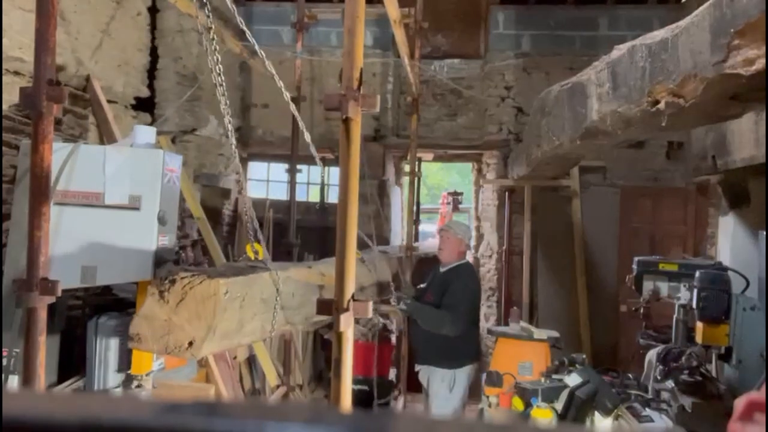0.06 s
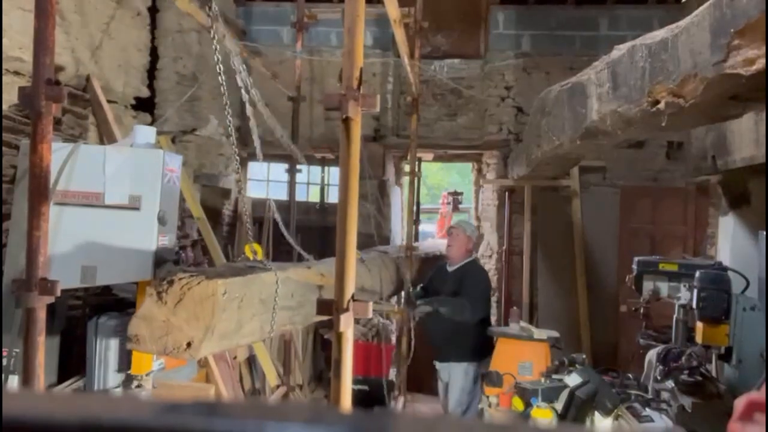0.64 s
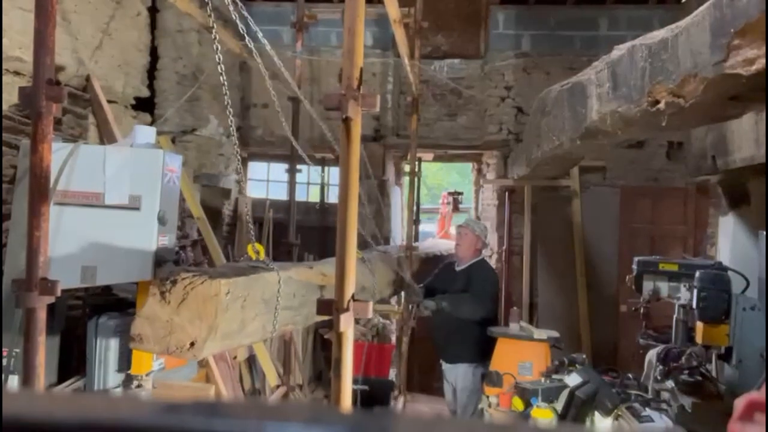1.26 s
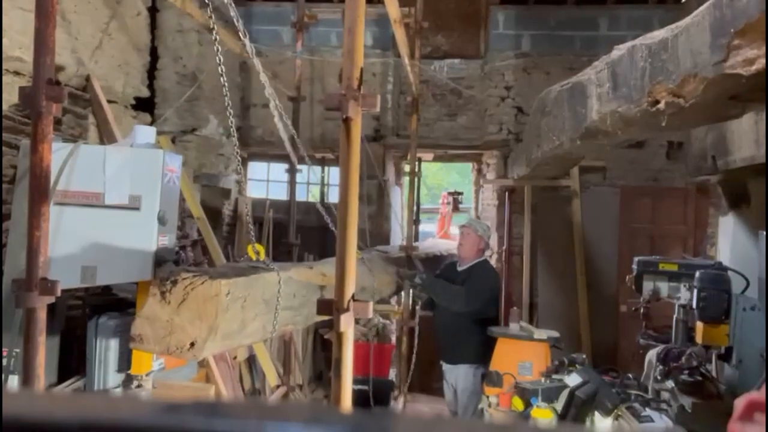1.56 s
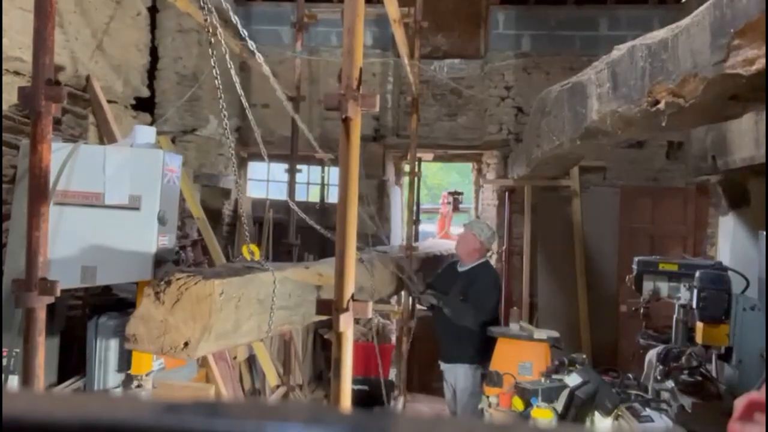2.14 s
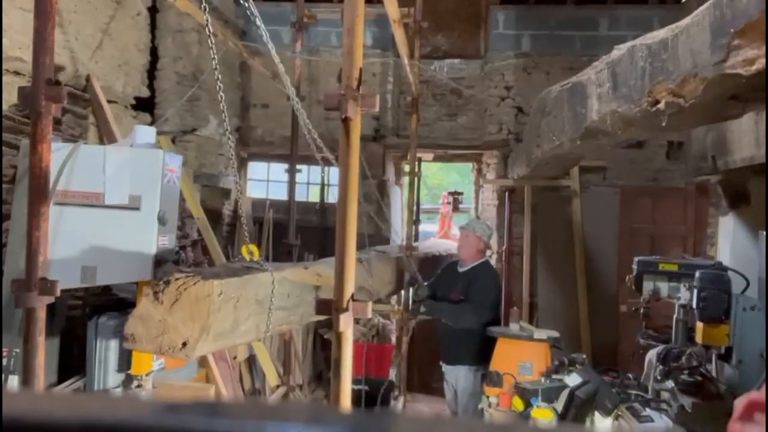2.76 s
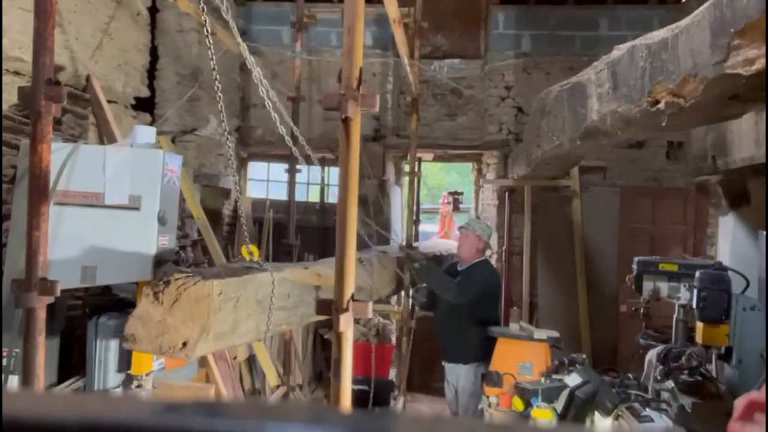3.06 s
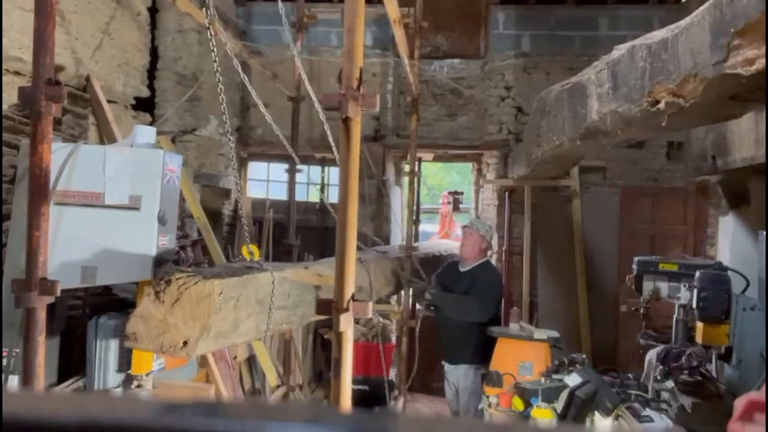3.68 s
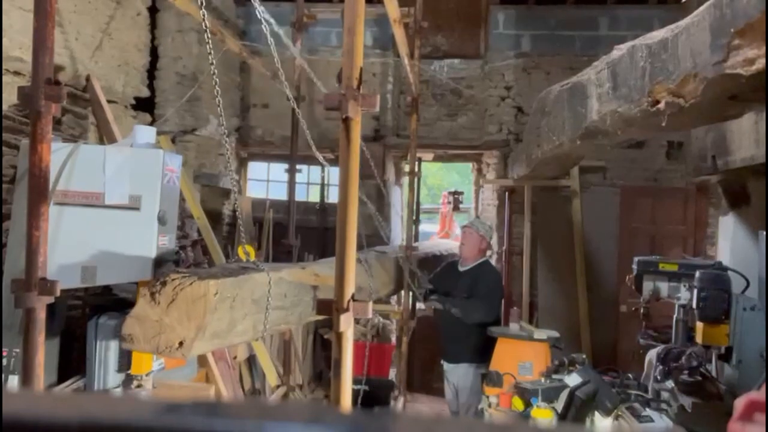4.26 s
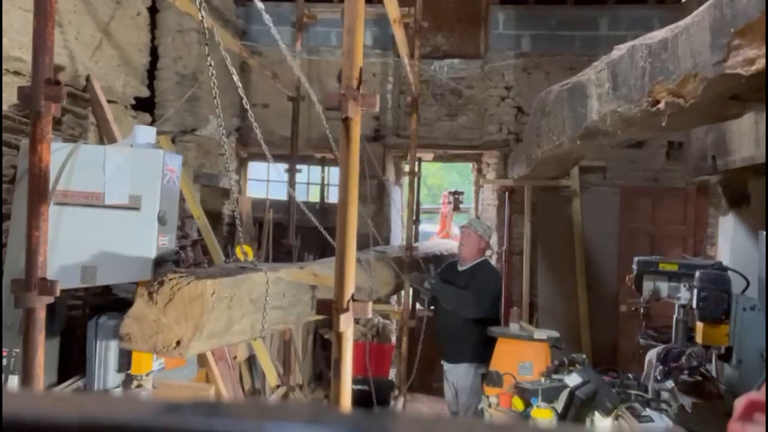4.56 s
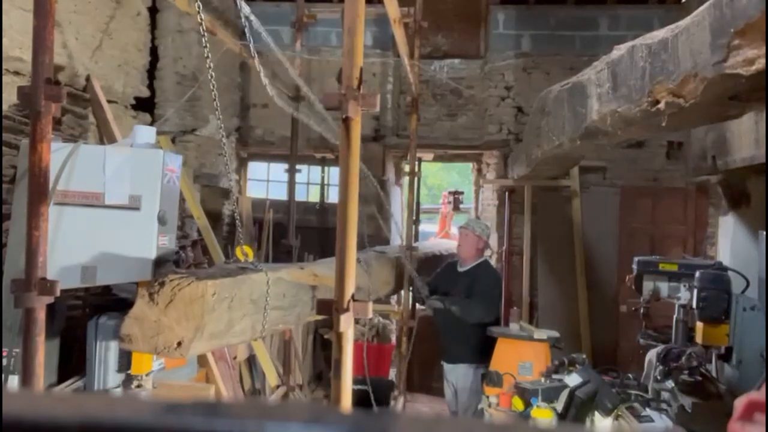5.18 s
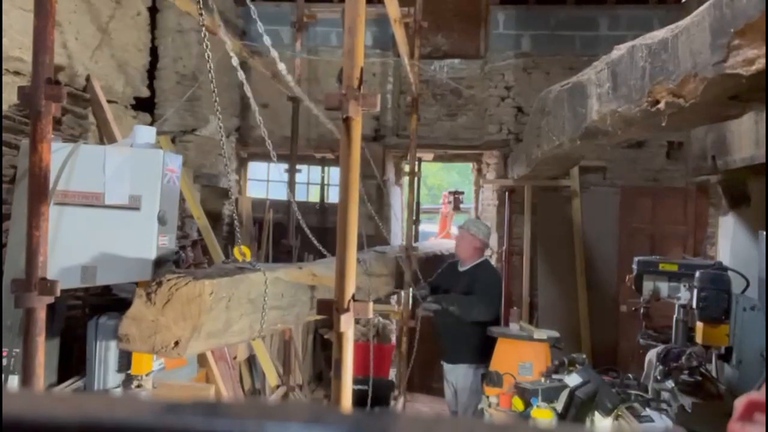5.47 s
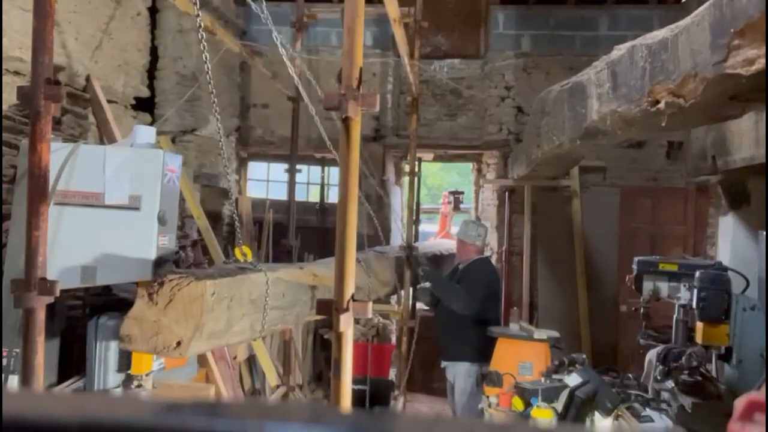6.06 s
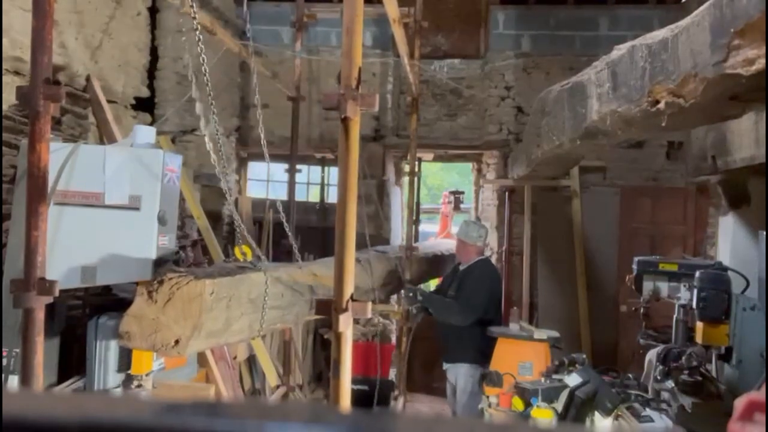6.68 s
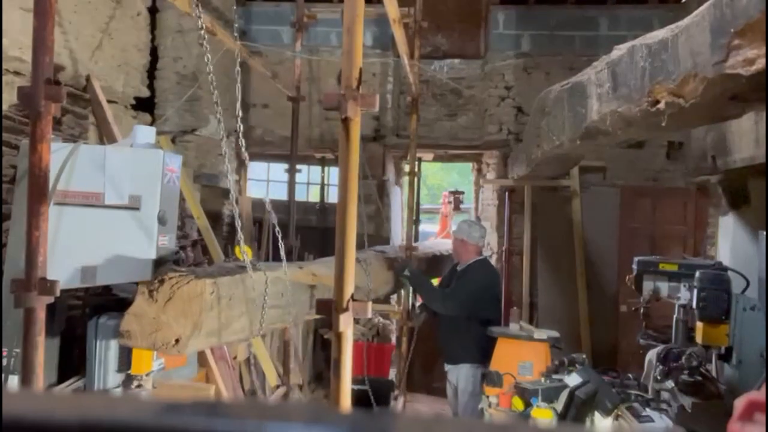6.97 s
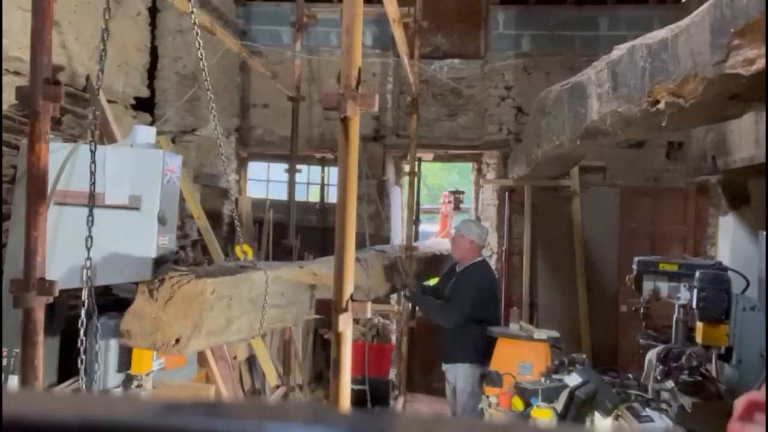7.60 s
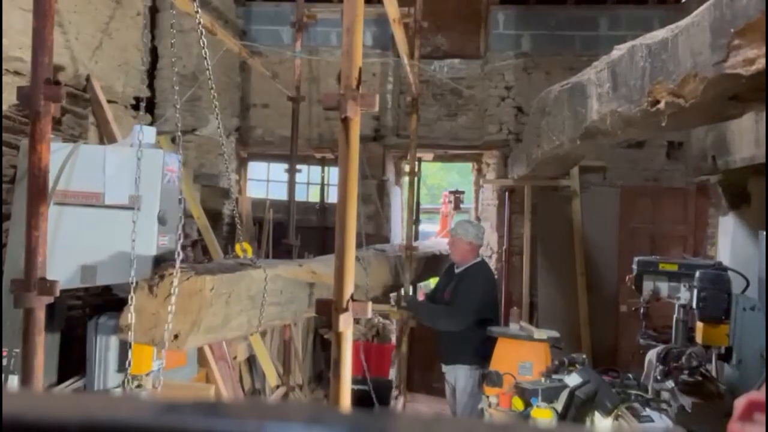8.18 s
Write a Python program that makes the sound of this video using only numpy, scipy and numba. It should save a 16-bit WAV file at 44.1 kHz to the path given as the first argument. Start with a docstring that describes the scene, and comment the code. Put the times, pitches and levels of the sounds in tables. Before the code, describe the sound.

The hand chain of a hoist rattles and clinks in uneven pulls inside a barn, over a low steady engine hum.

```python
"""Chain hoist in a stone barn

A stereo pair stands in the barn, the block hanging to its left, as a man shifts a heavy beam pull by pull.
The hand chain clatters over the wheel and knocks on the steel housing; a thin whine comes in brief bursts.
At the end the slack loop swings and jingles straight ahead. Close timber and stone walls reflect it all.
Farther off, an engine hums steadily through the walls."""
import sys
import numpy as np
from scipy import signal
from scipy.fft import rfft, irfft, next_fast_len
from scipy.io import wavfile
from scipy.ndimage import uniform_filter1d, map_coordinates
from numba import njit

SR = 44100
rng = np.random.default_rng(int(sys.argv[2]) if len(sys.argv) > 2 else 0)


def output_pcm(signal):
    """Save a mono or channel-first signal as 16-bit PCM at the path in sys.argv[1].

    Samples are clipped to [-1, 1] before scaling.
    """
    pcm = np.clip(np.atleast_2d(signal).T, -1, 1) * 32767
    wavfile.write(sys.argv[1], SR, np.round(pcm).astype(np.int16))


N = 367331

# Table levels are relative: each source is given its own gain further down.
# room tone of the barn: (frequency [Hz], level [dB])
ROOM_TONE = [(20, -17), (40, -15), (65, 3), (110, -0.5), (190, -11.5), (310, 0), (450, -4.5), (800, -15.5),
             (1500, -19.5), (4000, -34), (11000, -53)]
# the engine outside, slowing a little: (time [s], firing rate [Hz])
FIRING_RATE = [(0, 87.9), (1.6, 87.7), (3.1, 86.7), (5.7, 85.7), (8.33, 84.3)]
# its tones through the wall: (multiple of the firing rate, level [dB])
HUM_ORDERS = [(.5, -42.5), (1, -31), (1.5, -40.5), (4.5, -52.5)]
# reverberation off the stone walls: (frequency [Hz], t60 [s])
WALL_DECAY = [(200, 0.93), (1000, 0.26), (4000, 0.37), (11000, 0.21)]
# side against mid in reflections and room tone: (frequency [Hz], gain [dB])
SIDE_GAIN = [(30, -20), (80, -11), (330, -12.5), (600, 0), (2300, -2), (6800, 0), (8000, -5), (8800, -53),
             (12000, -53)]
# left microphone over right: (frequency [Hz], gain [dB])
MIC_BALANCE = [(43, 1), (86, 4), (130, 5), (250, 0.7), (550, 0.5), (1000, 2.5), (2200, -0.6), (4200, -1),
               (8000, -1)]

# groans under the shifting load: (start [s], length [s], pitch [Hz], level [dB])
LOAD_GROANS = [(0.579, 0.088, 260.7, -37), (0.988, 0.12, 252.6, -42), (7.507, 0.27, 222.6, -43.5)]
# swings of the slack loop: (start [s], rise [s], hold [s], level [dB])
LOOP_SWINGS = [(0, 0.00078, 0.13, -33), (.13, 0.012, 0.089, -37), (6.483, 0.035, 0.13, -33.5),
               (6.68, 0.03, 0.12, -48.5), (7.179, 0.096, 0.079, -35.5), (7.415, 0.011, 0.052, -31),
               (7.51, 0.015, 0.084, -34), (7.6, 0.017, 0.29, -36.5), (7.899, 0.093, 0.25, -31),
               (8.22, 0.013, 0.087, -41.5)]
# the loop's jingle: (frequency [Hz], level [dB])
LOOP_SPECTRUM = [(260, -49), (450, -4), (584, 5.5), (689, -12), (780, -4.5), (1240, -1.5), (1470, -3.5),
                 (1640, 0), (3630, -6), (4280, -2), (4850, -6.5), (7950, -4), (8990, -2.5), (11100, -5),
                 (12000, -19), (15600, -44), (22000, -120)]
# links sliding through the guide: (start [s], length [s], level [dB])
GUIDE_SLIDES = [(.385, 0.045, -38.5), (0.814, .1, -38.5), (1.235, 0.097, -37)]
# their hiss: (frequency [Hz], level [dB])
SLIDE_SPECTRUM = [(3000, -12), (5400, 2), (7500, -4), (11000, -18)]
# brief bursts of a thin, high whine: (start [s], length [s], level [dB])
WHINE_BURSTS = [(1.216, 0.31, -42.5), (2.551, 0.1, -35), (3.094, 0.12, -28), (3.986, 0.086, -30.5),
                (5.875, 0.086, -37.5)]
# partials of the whine: (frequency [Hz], level [dB])
WHINE_PARTIALS = [(3792, 12), (3990, 3), (4225, -3), (4900, -3), (5250, -7), (5950, 5.5), (6300, 0),
                  (6650, -3)]
# jerks of the load: (time [s], level [dB])
LOAD_JERKS = [(0.018, -23.5), (0.064, -33), (0.595, -27.5), (2.092, -30), (3.375, -35), (4.223, -22),
              (5.038, -20), (5.084, -23), (5.15, -32), (5.365, -31), (5.427, -23)]
# the block on its hook: (frequency [Hz], spread [Hz], level [dB])
BLOCK_MODES = [(306, 22, -6), (430, 12, 4), (544, 56, 3), (648, 56, 4)]
# one link tapping the next: (time [s], level [dB])
LINK_TAPS = [(0.593, -14.5), (1.114, -35), (1.198, -33), (1.456, -27), (1.486, -27), (1.571, -21),
             (1.592, -35), (1.731, -25), (1.784, -29), (1.97, -25), (2.353, -28), (2.77, -26), (3.236, -20),
             (3.333, -14.5), (4.627, -19.5), (5.093, -23), (6.2183, -13)]
# a single link: (frequency [Hz], spread [Hz], level [dB])
TAP_MODES = [(4207, 67, 2), (4430, 60, -8.5)]
# the sharpest steel-on-steel clacks: (time [s], level [dB])
STEEL_SNAPS = [(0.447, -17), (0.5826, -10), (1.8927, -9.5), (2.275, -11), (2.9168, -15.5), (3.8113, -10),
               (4.109, -12), (4.8742, -20), (5.345, -23), (5.364, -11), (5.5975, -11), (6.4901, -19),
               (6.8602, -19), (7.082, -28)]
# their noise: (frequency [Hz], level [dB])
SNAP_SPECTRUM = [(1500, -8), (4300, -1), (6000, -2), (11000, -2)]
# links striking the rim: (time [s], pitch [Hz], level [dB])
RIM_STRIKES = [(1.017, 2914, -22), (1.894, 2800, -25), (2.035, 2900, -21.5), (3.372, 2460, -21),
               (4.068, 2830, -28), (4.136, 2910, -21), (4.225, 2880, -20), (4.526, 2940, -24),
               (4.639, 2870, -23.5), (4.787, 2930, -36), (5.042, 2870, -22), (5.128, 2885, -16.5),
               (6.1, 3190, -23), (6.19, 2954, -16), (6.294, 2908, -14), (6.33, 2920, -17.5)]
# the wheel's rim: (frequency [Hz], spread [Hz], level [dB])
RIM_RING = [(1486, 4.5, 1), (2570, 6.5, -3), (8800, 59, -11)]
# links dropping into the wheel's pockets: (time [s], pitch [Hz], level [dB])
POCKET_DROPS = [(2.825, 807, -23), (2.854, 780, -27), (2.938, 934, -24.5), (3.141, 817, -26),
                (3.2, 733, -20), (3.241, 818, -21), (3.28, 821, -19), (3.314, 1030, -16),
                (3.348, 705, -15.5), (3.376, 914, -16), (3.455, 810.2, -23.5), (3.645, 800, -27),
                (3.715, 920, -22), (3.766, 1100, -21.5), (3.98, 825, -16.5), (4.068, 913, -15),
                (4.123, 770, -21), (4.189, 1044, -15.5), (4.455, 802, -25)]
# loose links beside the block: (frequency [Hz], level [dB])
JINGLE_SPECTRUM = [(600, -36), (1800, 4), (3700, 1.5), (4400, -19), (5100, -5.5), (6200, 4.5), (7400, 6),
                   (8400, 1), (9200, 7.5), (10800, 5), (11500, -4), (12200, -75)]
# the steel housing: (frequency [Hz], spread [Hz], level [dB])
HOUSING_RING = [(376, 20, -10.5), (535.5, 61, -12.5), (724.3, 17, 3), (801.3, 47, -2.5), (933.4, 38, -5.5),
                (1052, 21.5, 0), (1245, 38, -16)]
# contact noise on the housing: (frequency [Hz], level [dB])
KNOCK_SPECTRUM = [(150, -74), (300, -21.5), (520, -11), (780, 2.5), (1050, -7.5), (1400, -9.5),
                  (2200, -20.5), (5000, -54)]
# links ringing on the wheel: (frequency [Hz], spread [Hz], level [dB])
WHEEL_RING = [(1642, 22, -20), (2482, 162, -2.5), (2895, 75, 1.5), (3290, 84, -4), (3528, 89, 3.5),
              (4155, 94, 1), (4395, 101, -1), (5120, 173, -9.5), (6050, 310, -11.5), (7400, 120, -8)]
# contact noise on the wheel: (frequency [Hz], level [dB])
SCRAPE_SPECTRUM = [(500, -50), (1200, -3.5), (1550, 2.5), (1850, 2.5), (2180, -16), (2480, 7), (3250, -11),
                   (3850, 0), (4250, 7.5), (4900, -19), (6000, -11), (8000, -20), (12000, -39.5)]
# pulls on the chain: (start [s], rise [s], hold [s], wheel [dB], housing [dB], loose links [dB])
CHAIN_PULLS = [(.39, 0.083, 0.0079, -38.5, -55, -35.5), (.51, 0.076, 0.011, -34.5, -34.5, -29.5),
               (.7, 0.0083, 0.047, -42, -43.5, -62), (.94, 0.049, 0.03, -35.5, -35, -30.5),
               (1.149, 0.0038, 0.012, -43, -42.5, -36), (1.478, 0.0089, 0.074, -39.5, -42, -40.5),
               (1.779, 0.011, 0.11, -44.5, -41.5, -40), (1.879, 0.003, 0.16, -31, -32, -29),
               (2.01, 0.022, 0.1, -26, -25, -28.5), (2.27, 0.0098, .13, -38.5, -35.5, -36),
               (2.55, 0.014, 0.03, -41.5, -44, -42), (2.77, 0.095, 0.13, -38.5, -39, -44),
               (3.08, 0.011, 0.05, -32, -40, -30), (3.192, 0.14, 0.052, -22.5, -26, -24),
               (3.607, 0.0043, 0.041, -33.5, -34, -36.5), (3.7, 0.059, 0.12, -34, -34.5, -33.5),
               (4.016, 0.16, 0.052, -24.5, -27, -27.5), (4.439, 0.072, 0.073, -30, -33, -35),
               (4.87, 0.11, 0.12, -36.5, -43, -41), (5.019, 0.016, 0.1, -25.5, -25.5, -29.5),
               (5.356, 0.0032, 0.082, -29.5, -29.5, -34.5), (5.6, .005, 0.082, -62, -50, -44),
               (6.013, 0.19, 0.14, -25.5, -30, -28), (6.49, 0.015, 0.21, -35, -36.5, -53),
               (6.69, 0.016, 0.12, -35, -38.5, -58)]
# single hard contacts: (time [s], wheel [dB], housing [dB], loose links [dB])
HARD_CONTACTS = [(0.4484, -17, -39, -26), (0.583, -19, -37, -19.5), (0.5916, -17.5, -22.5, -32),
                 (0.7158, -22, -34.5, -32.5), (0.9283, -19.5, -47, -28), (1.0211, -15, -33, -27),
                 (1.4307, -36, -58, -29), (1.673, -42, -47, -37), (1.8935, -26, -33, -16.5),
                 (2.0234, -16, -20, -19), (2.1213, -13.5, -22, -18.5), (2.1544, -21, -28, -15),
                 (2.2753, -16, -36, -18), (2.773, -19, -35.5, -31), (2.8244, -16.5, -27, -28),
                 (2.9174, -17.5, -36, -24.5), (3.0814, -21, -33, -18.5), (3.3734, -11.5, -27, -25),
                 (3.4433, -15.5, -40, -19), (3.6182, -19.5, -51, -26.5), (3.716, -15.5, -25.5, -25),
                 (3.7615, -13, -25, -19.5), (3.8105, -5.5, -25.5, -22), (4.0672, -15, -21.5, -20),
                 (4.1081, -17, -38, -20.5), (4.2203, -26, -24, -15), (4.5246, -22.5, -22.5, -23),
                 (4.8748, -18.5, -35, -43), (4.936, -25, -35, -29), (5.04, -20, -17.5, -33),
                 (5.1227, -19, -25, -19), (5.3645, -10.5, -21.5, -21.5), (5.4232, -19, -19, -36),
                 (5.5992, -18.5, -37, -23.5), (6.099, -22, -28, -20), (6.1664, -14, -27, -20),
                 (6.2009, -6.5, -42, -14), (6.2954, -10.5, -22, -15.5), (6.49, -25, -37.5, -28),
                 (6.776, -12.5, -46, -19), (6.8608, -24, -29, -28), (6.9338, -19.5, -38, -30.5),
                 (7.1829, -23, -46, -27.5), (7.4287, -17, -42, -25), (7.799, -21, -39, -25)]
# lead-in tick, blow and rebound of a hard contact: (time from the blow [s], level [dB])
BOUNCE = [(-.003, -9.5), (0, -2), (.006, -8.5)]
# the chain goes quiet while the hands change grip: (start [s], end [s])
GRIP_CHANGES = [(2.98, 3.19), (5.22, 5.43), (5.78, 5.77), (6.98, 7.1), (1.63, 1.72), (4.72, 4.78)]

WHEEL, HOUSING, LOOSE_LINKS = 0, 1, 2  # order of the level columns in pulls and hard contacts
START_DB, STOP_DB_PER_S = 11, 147  # a run starts this far down, and dies at this rate after its hold
IDLE_DB, GRIP_DB = -49, -22.5  # links stirring between pulls; the dip at a change of grip
LIFT_S, LIFT_DB = 0.016, -3  # the chain jumps clear just before it slaps down
PULL_TO_LOOP_DB = -8  # every pull also shakes the slack loop
LINKS_PER_S, LINK_DETUNE, LINK_COLOUR_DB = 30, 0.4, 2.5  # links seating, and how their modes differ
LIGHT_DB = -11  # contacts with less energy than this stray most in pitch
GAP_HZ, GAP_WIDTH_HZ, GAP_DB = 3810, 72, -12  # a gap between the wheel's resonances
BLOCK_LEAD_S, ENGINE_LEAD_S = 0.000098, 0.00059  # each reaches the left microphone this much sooner
TOP_HZ = 12250


def amp(db):
    """Decibels to gain."""
    return 10 ** (np.asarray(db) / 20)


def unit(x):
    """x at rms 1."""
    return x / np.sqrt(np.mean(x ** 2) + 1e-20)


def along(points, hz):
    """(frequency, value) points read on a log frequency axis."""
    point_hz, values = np.transpose(points)
    return np.interp(np.log(hz + 1), np.log(point_hz), values)


def samples(s):
    """Times as sample numbers."""
    return np.clip(s * SR, 0, N - 1).astype(np.int64)


def within(s, starts, ends):
    """Which of the times s fall inside any of the spans."""
    return np.any((s[:, None] > starts) & (s[:, None] < ends), axis=1)


def wobble(rate):
    """A smooth random curve with rate knots a second."""
    knots = rng.standard_normal(int(N * rate / SR) + 4)
    return map_coordinates(knots, [np.arange(N) * rate / SR])


def arch(start, length):
    """A rounded swell from silence to silence."""
    progress = np.clip((np.arange(N) / SR - start) / length, 0, 1)
    return np.sqrt(np.abs(np.sin(np.pi * progress)))


def filtered(x, response):
    """x through a frequency response."""
    size = next_fast_len(N + SR // 2)
    return irfft(rfft(x, size) * response(np.fft.rfftfreq(size, 1 / SR)), size)[..., :N]


def coloured(x, spectrum):
    """x shaped by a spectrum; white noise keeps its power."""
    return filtered(x, lambda hz: unit(amp(along(spectrum, hz))))


@njit
def damped_sines(starts, turns, sizes, fall, length, total):
    """Sum of decaying sines: one row for each contact, one column for each mode."""
    out = np.zeros(total + length)
    for i in range(len(starts)):
        feedback = 2 * fall * np.cos(turns[i])
        before, now = np.zeros(len(feedback)), sizes[i] * np.sin(turns[i])
        for n in range(length):
            summed = 0.
            for k in range(len(feedback)):
                summed += now[k]
                before[k], now[k] = now[k], feedback[k] * now[k] - fall * fall * before[k]
            out[starts[i] + n] += summed
    return out[:total]


def ring(at, energy, hz, weights, t60, vary_db=5):
    """Struck steel: each contact shares its energy among its modes in a new way."""
    fall = amp(-60 / (t60 * SR))
    sizes = weights * amp(vary_db * rng.standard_normal(hz.shape)) * rng.choice([-1, 1], hz.shape)
    sizes *= np.sqrt(2 * energy * (1 - fall ** 2) / np.sum(sizes ** 2, axis=1))[:, None]
    return damped_sines(at, 2 * np.pi * hz / SR, sizes, float(fall), int(t60 * SR), N)


def body_ring(at, energy, modes, t60, detune):
    """Ringing of a body whose modes shift a little from contact to contact."""
    hz, spread, db = np.transpose(modes)
    hz = hz + detune * spread * rng.standard_normal((len(at), len(hz)))
    return ring(at, energy, hz, amp(db) * np.sqrt(spread), t60, vary_db=3.0)


def crack(at, energy, spectrum, t60):
    """A short burst of noise at each contact."""
    fall = amp(-60 / (t60 * SR)) ** 2
    power = signal.lfilter([1 - fall], [1, -fall], np.bincount(at, energy, N))
    return coloured(np.sqrt(power) * rng.standard_normal(N), spectrum)


def blows(s, db, held_s):
    """Sample and energy of blows, each carrying the energy of its level held for held_s."""
    return samples(s), amp(db) ** 2 * held_s * SR


def stream(rate, scatter_db):
    """Time and energy of each contact in an uneven stream of unit power, rate a second."""
    count = int(rate * N / SR)
    s = (np.arange(count) + rng.uniform(-1, 1, count)) / rate
    share = amp(scatter_db * rng.standard_normal(count)) ** 2
    return s, share / uniform_filter1d(share, size=7) * SR / rate


def surges(s, runs, level_db):
    """Power at times s of runs of chain: each builds, holds and dies away."""
    start, rise, hold = np.transpose(runs)[:3]
    age = s[:, None] - start
    rising_db = START_DB * np.clip(1 - age / rise, 0, 1)
    stopping_db = STOP_DB_PER_S * np.maximum(age - rise - hold, 0)
    return np.sum((age >= 0) * amp(level_db - rising_db - stopping_db) ** 2, axis=1)


def swing_power(s):
    """Power of the slack loop's swings at times s."""
    return surges(s, LOOP_SWINGS, np.transpose(LOOP_SWINGS)[3])


def pull_power(s, part):
    """Power the pulls put into one part of the hoist at times s."""
    return surges(s, CHAIN_PULLS, np.transpose(CHAIN_PULLS)[3 + part])


def contacts(part, hard_s, swing_db, rate, scatter_db):
    """Sample and energy of each contact on one part: the running chain, then the hard blows."""
    s, energy = stream(rate, scatter_db)
    power = pull_power(s, part) + amp(swing_db) ** 2 * swing_power(s) + amp(IDLE_DB) ** 2
    blow_s, blow_db = np.transpose(HARD_CONTACTS)[[0, 1 + part]]
    grip_db = GRIP_DB * within(s, *np.transpose(GRIP_CHANGES))
    lift_db = LIFT_DB * within(s, blow_s - LIFT_S, blow_s)
    running = energy * power * amp(grip_db + lift_db) ** 2
    bounce_s, bounce_db = np.transpose(BOUNCE)
    hard_at, hard = blows(blow_s[:, None] + bounce_s, blow_db[:, None] + bounce_db, held_s=hard_s)
    return np.append(samples(s), hard_at), np.append(running, hard)


def room_tone():
    """The barn's air, mid and side: a faint, low rush."""
    return amp(-43.5) * coloured(rng.standard_normal((2, N)), ROOM_TONE)


def engine():
    """An engine outside, left and right: only its lowest orders come through the walls."""
    rate_hz = np.interp(np.arange(N) / SR, *np.transpose(FIRING_RATE))
    phase = 2 * np.pi * np.cumsum(rate_hz + 0.088 * wobble(6.6)) / SR
    hum = sum(amp(db + 0.66 * wobble(3.14)) * np.sin(order * phase + rng.uniform(0, 2 * np.pi))
              for order, db in HUM_ORDERS)
    return np.array([hum, filtered(hum, lambda hz: np.exp(-2j * np.pi * hz * ENGINE_LEAD_S))])


def reflections(x, t60s, paths):
    """Mid and side reflections of x, by one set of paths after another as the chain moves."""
    length = int(SR * np.max(np.transpose(t60s)[1]))
    hz, t, noise = signal.stft(rng.standard_normal((paths, 2, length)), SR, nperseg=256)
    tails = signal.istft(noise * amp(-60 * t / along(t60s, hz)[:, None]), SR, nperseg=256)[1]
    hop, delay = N // paths + 1, SR // 400
    out = np.zeros((2, 2 * N))
    for k, tail in enumerate(tails):
        stretch = x[None, k * hop:(k + 1) * hop]
        answer = signal.fftconvolve(stretch, tail / np.linalg.norm(tail[0]), axes=1)
        out[:, k * hop + delay:][:, :answer.shape[1]] += answer
    return out[:, :N]


def groans():
    """Faint, unsteady low tones as the load shifts."""
    turn = 2 * np.pi * np.cumsum(1 + 0.11 * wobble(110)) / SR
    return sum(amp(db) * arch(s, length) * np.sin(hz * turn) for s, length, hz, db in LOAD_GROANS)


def slack_loop():
    """Straight ahead, the free loop shakes along its whole length: a dense jingle."""
    s, energy = stream(rate=300, scatter_db=3.0)
    tugged = amp(PULL_TO_LOOP_DB) ** 2 * pull_power(s, LOOSE_LINKS)
    at, energy = samples(s), energy * (swing_power(s) + tugged)
    hz = rng.uniform(2193, 11600, (len(at), 8))
    ticks = crack(at, energy, LOOP_SPECTRUM, t60=0.01)
    return ticks + ring(at, energy, hz, amp(along(LOOP_SPECTRUM, hz)), t60=0.082, vary_db=5.5)


def guide_slides():
    """The chain slips through its guide with a brief, bright swish."""
    swell = sum(amp(db) * arch(s, length) for s, length, db in GUIDE_SLIDES)
    return swell * coloured(rng.standard_normal(N), SLIDE_SPECTRUM)


def thin_whine():
    """Brief bursts of a thin, rough, buzzy high whine."""
    swell = sum(amp(db) * arch(s, length) for s, length, db in WHINE_BURSTS)
    drift, roughness = 0.00283 * wobble(40), 0.017 * wobble(500)
    turn = 2 * np.pi * np.cumsum(1 + drift + roughness) / SR
    flutter = amp(3.5 * wobble(150))
    whine = sum(amp(db) * np.sin(hz * turn) for hz, db in WHINE_PARTIALS)
    return amp(0.5) * swell * unit(flutter * whine)


def block_thuds():
    """The chain snaps taut and the block thuds on its hook, without deep bass."""
    at, energy = blows(*np.transpose(LOAD_JERKS), held_s=0.0039)
    thud = body_ring(at, energy, BLOCK_MODES, t60=0.13, detune=0.51)
    high_pass = signal.butter(4, 270, "highpass", fs=SR, output="sos")
    return amp(-3.5) * signal.sosfilt(high_pass, thud)


def link_taps():
    """One link taps the next: a short, high tink."""
    at, energy = blows(*np.transpose(LINK_TAPS), held_s=0.001)
    return body_ring(at, energy, TAP_MODES, t60=0.042, detune=1)


def steel_snaps():
    """Steel meets steel: the sharpest contacts give a short, bright snap."""
    at, energy = blows(*np.transpose(STEEL_SNAPS), held_s=0.00055)
    return crack(at, energy, SNAP_SPECTRUM, t60=0.0084)


def rim_clinks():
    """A link strikes the rim and rings at its own pitch; the rim answers like a small bell."""
    s, hz, db = np.transpose(RIM_STRIKES)
    at, energy = blows(s, db, held_s=0.0082)
    link = ring(at, energy, hz[:, None], 1, t60=0.098)
    rim = body_ring(at, energy, RIM_RING, t60=0.21, detune=0.98)
    return amp(-1.0) * link + amp(-9.5) * rim


def pocket_clunks():
    """A link drops into its pocket: a hollow clunk at its own pitch, and the housing answers."""
    s, hz, db = np.transpose(POCKET_DROPS)
    at, energy = blows(s, db, held_s=0.0018)
    clunk = ring(at, energy, hz[:, None], 1, t60=0.069)
    knock = crack(at, energy, KNOCK_SPECTRUM, t60=0.034)
    scrape = crack(at, energy, SCRAPE_SPECTRUM, t60=0.038)
    return amp(-3.5) * clunk + amp(-4) * knock + amp(-11.5) * scrape


def loose_links():
    """Links tick against each other beside the block, each at its own high pitches."""
    at, energy = contacts(LOOSE_LINKS, hard_s=0.0054, swing_db=-3.5, rate=120, scatter_db=4.5)
    hz = rng.uniform(5200, 11400, (len(at), 5))
    ticks = crack(at, energy, JINGLE_SPECTRUM, t60=0.028)
    jingle = ring(at, energy, hz, amp(along(JINGLE_SPECTRUM, hz)), t60=0.082)
    return amp(-2.5) * jingle + amp(-5.0) * ticks


def housing_knocks():
    """Links bump the steel housing, which answers with a hollow knock."""
    at, energy = contacts(HOUSING, hard_s=0.014, swing_db=-9.0, rate=55, scatter_db=1.5)
    shell = body_ring(at, energy, HOUSING_RING, t60=0.11, detune=0.21)
    knock = crack(at, energy, KNOCK_SPECTRUM, t60=0.062)
    return amp(-7.0) * shell + amp(-9.0) * knock


def wheel_clatter():
    """Each link seats in the wheel in about three contacts and rings with its own colour."""
    at, energy = contacts(WHEEL, hard_s=0.00099, swing_db=-5.5, rate=85, scatter_db=2.0)
    hz, spread, db = np.transpose(WHEEL_RING)
    link = at * LINKS_PER_S // SR
    shift, colour = rng.standard_normal((2, link.max() + 1, len(hz)))[:, link]
    lightness = 1 / (1 + energy / amp(LIGHT_DB) ** 2)
    stray_hz = 0.0546 * hz * lightness[:, None] * rng.standard_normal(shift.shape)
    hz = hz + LINK_DETUNE * spread * shift + stray_hz
    weights = amp(db + LINK_COLOUR_DB * colour) * np.sqrt(spread)
    ringing = ring(at, energy, hz, weights, t60=0.11, vary_db=5.5)
    scrape = crack(at, energy, SCRAPE_SPECTRUM, t60=0.049)
    return amp(-0.5) * ringing + amp(-7.0) * scrape


def scene():
    """At the microphones: block to the left, loop ahead, timber close by, stone walls beyond."""
    clatter = wheel_clatter() + loose_links() + pocket_clunks()
    clatter = filtered(clatter, lambda hz: amp(GAP_DB * np.exp(-((hz - GAP_HZ) / GAP_WIDTH_HZ) ** 2)))
    block = (clatter + housing_knocks() + block_thuds() + rim_clinks() + link_taps()
             + steel_snaps() + guide_slides() + thin_whine())
    loop = slack_loop() + groans()
    direct = loop + filtered(block, lambda hz: np.exp(1j * np.pi * np.outer([1, -1], hz) * BLOCK_LEAD_S))
    timber = reflections(block + loop, t60s=[(500, 0.06), (8000, 0.027)], paths=50)
    walls = reflections(block + loop, WALL_DECAY, paths=14)
    air = room_tone()
    mid = amp(-4.0) * timber[0] + amp(-7.5) * walls[0] + air[0]
    side = amp(-1.0) * timber[1] + amp(-6.5) * walls[1] + air[1]
    side = filtered(side, lambda hz: amp(along(SIDE_GAIN, hz)))
    mics = direct + np.array([mid + side, mid - side]) + engine()
    return filtered(mics, lambda hz: amp(np.outer([0.5, -0.5], along(MIC_BALANCE, hz))))


def record(dry):
    """The recorder keeps nothing above its band limit."""
    return filtered(dry, lambda hz: np.clip((TOP_HZ - hz) / 300, 0, 1))


dry = scene()
out = record(dry)
output_pcm(out)
```